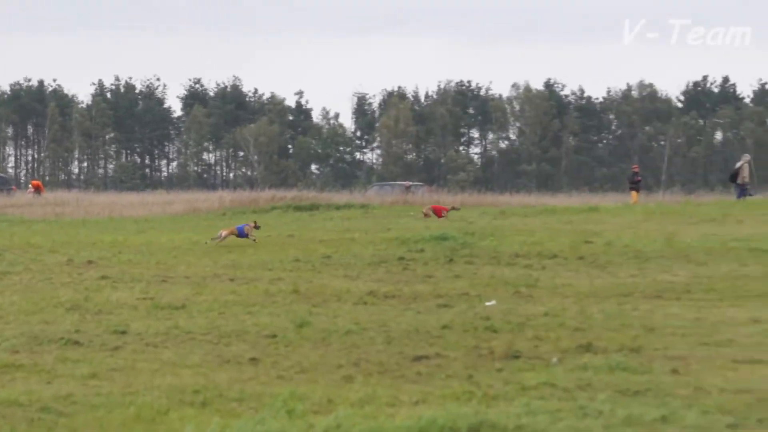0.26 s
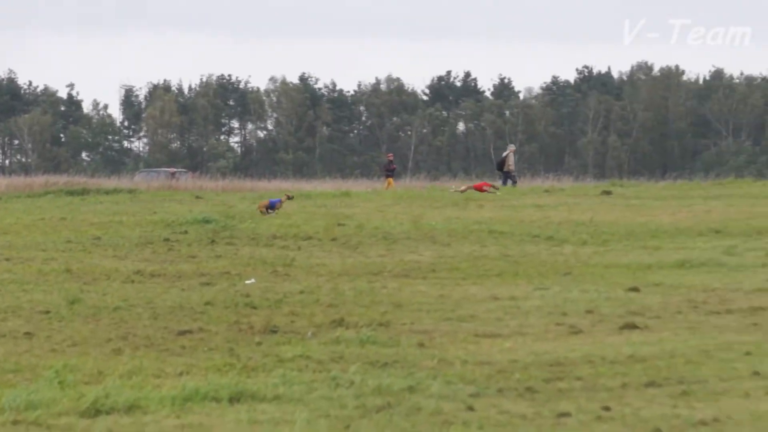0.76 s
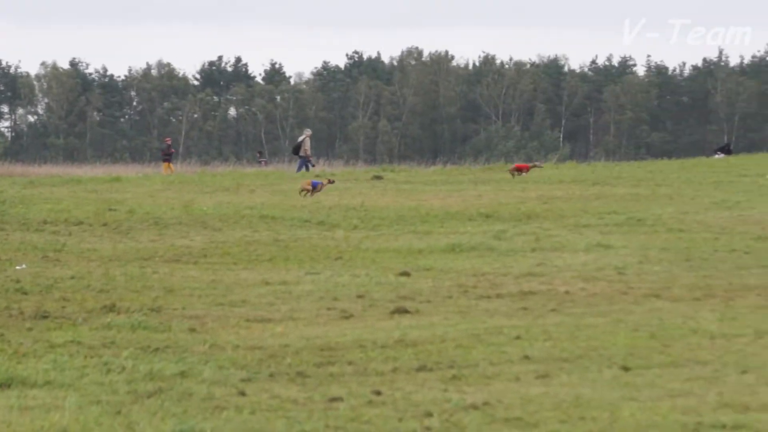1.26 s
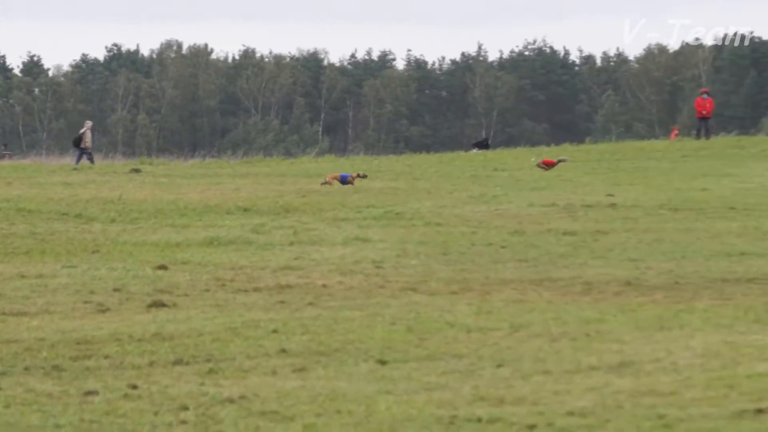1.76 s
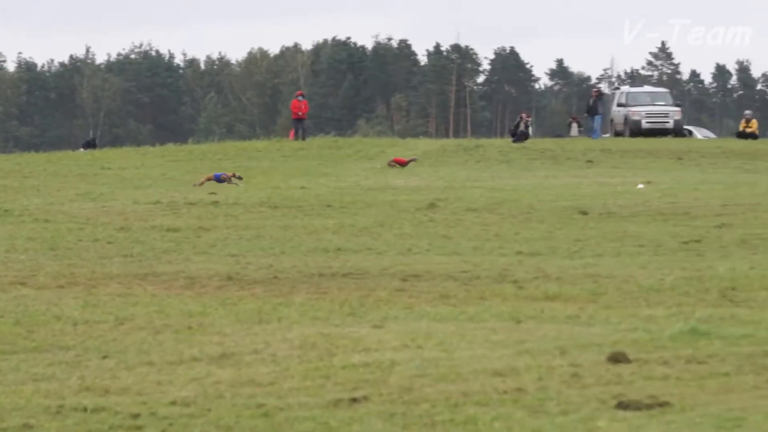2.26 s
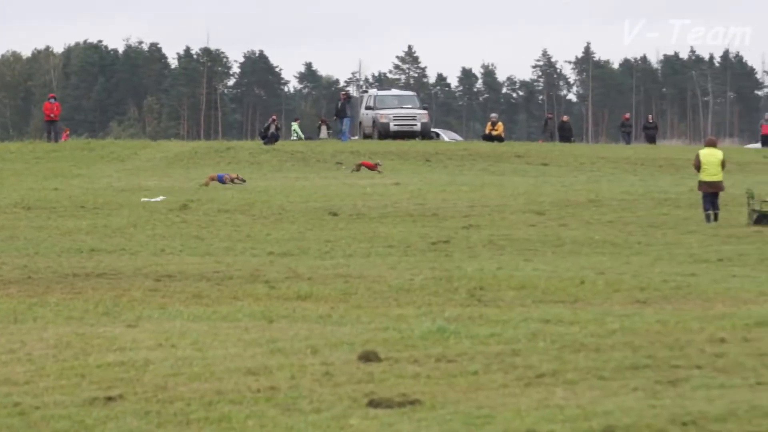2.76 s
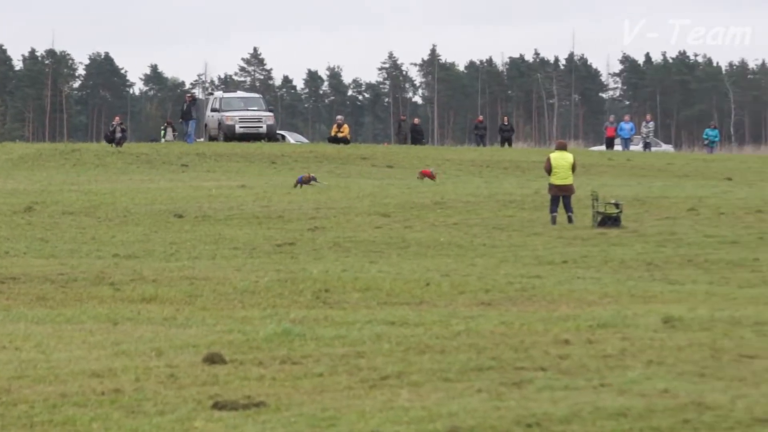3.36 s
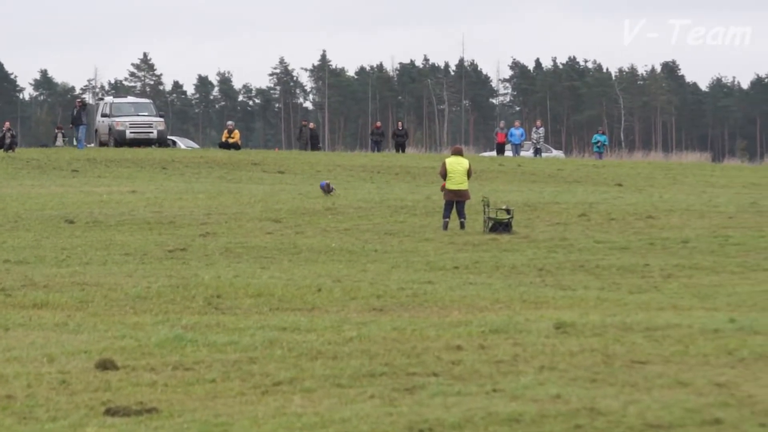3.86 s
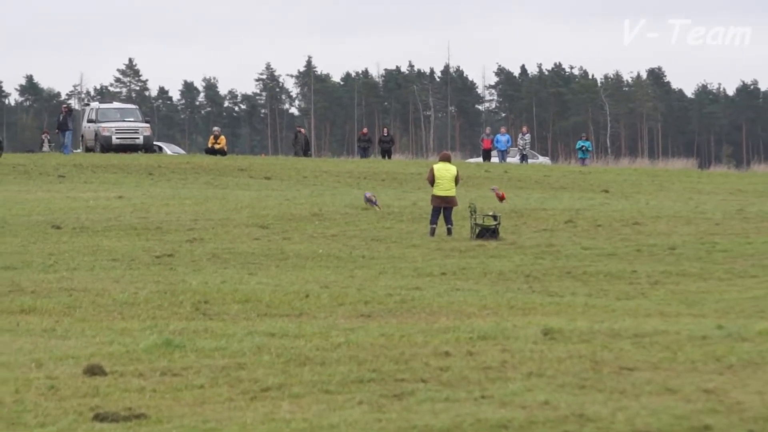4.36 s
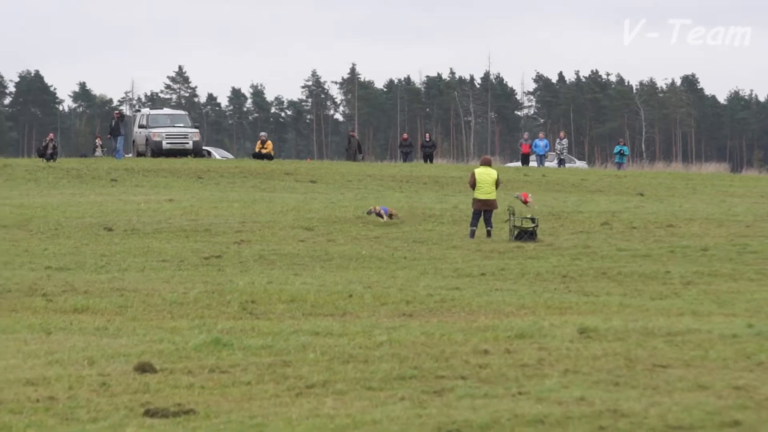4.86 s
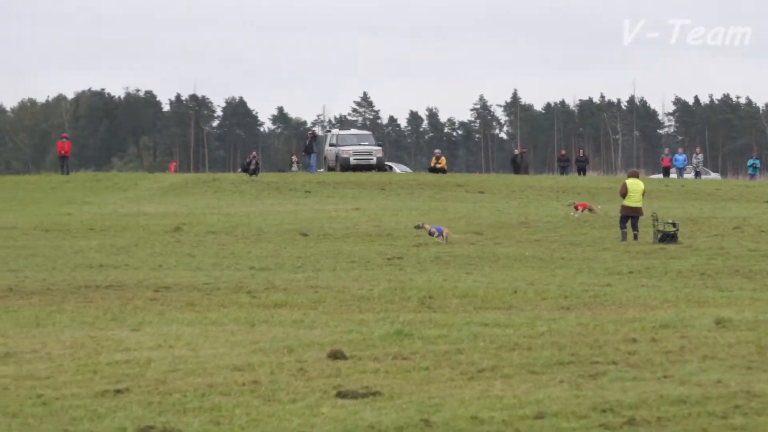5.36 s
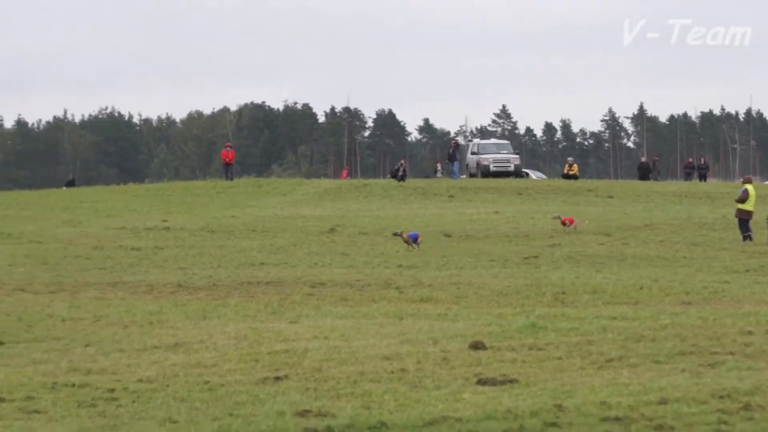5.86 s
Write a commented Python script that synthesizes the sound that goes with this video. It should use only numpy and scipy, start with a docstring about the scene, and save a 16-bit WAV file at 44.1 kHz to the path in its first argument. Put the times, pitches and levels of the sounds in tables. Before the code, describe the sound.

Close, uneven wind buffeting dominates, wide and shifting between left and right. Deep soft thuds and fluttering pushes arrive several times a second, edged with dull slaps and dry crackles. Behind them lie a quiet rush of grass and trees and a steady hiss. A barely noticeable whine wavers in the first half. From about two and a half seconds the wind is rougher and brighter, with a short slackening before the end.

```python
"""Gusty wind buffets the two ports of a small camera microphone in an open field.
From the start a breeze, a far rush of grass and a soft hiss are heard: all are shaped noise.
Gusts and short lulls then come and go; thuds are swells of rumble, slaps and crackles are puffs of noise.
From 0.8 s a thin whine, a sine of gliding pitch, comes and goes; near 1.1 s the camera body ticks twice.
Soft rounding of strong pushes and a reshaped stereo difference finish the sound."""
import sys
import numpy as np
from scipy import signal
from scipy.fft import rfft, irfft, next_fast_len
from scipy.io import wavfile
from scipy.ndimage import uniform_filter1d, map_coordinates

SR = 44100
rng = np.random.default_rng(int(sys.argv[2]) if len(sys.argv) > 2 else 0)


def wav_out(sig):
    """Save sig, one row per channel (or a flat mono array), as 16-bit PCM at SR to the path in sys.argv[1]."""
    wavfile.write(sys.argv[1], SR, np.round(np.clip(np.atleast_2d(sig).T, -1, 1) * 32767).astype(np.int16))


N = 269186  # length in samples


def amp(db):
    """dB to gain."""
    return 10 ** (np.asarray(db) / 20)


def unit(x):
    """Scaled to rms 1."""
    return x / np.sqrt(np.mean(x ** 2) + 1e-20)


def along(points, hz):
    """Read a value at each frequency from (Hz, value) points on a log axis."""
    f, v = np.transpose(points)
    return np.interp(np.log(hz + 1), np.log(f + 1), v)


def curves(rows):
    """One value per sample for each column after the time."""
    s, *cols = np.transpose(rows)
    return [np.interp(np.arange(N) / SR, s, c) for c in cols]


def wobble(rate):
    """A smooth random curve for each port, with rate knots a second."""
    at = [np.arange(N) * rate / SR]
    return np.array([map_coordinates(knots, at) for knots in rng.standard_normal((2, N // 50))])


def filtered(x, response):
    """Multiply the spectrum of x by a response of frequency."""
    edge = 4096
    size = next_fast_len(N + 16384)
    # mirror both ends so that the sound goes on past them
    x = np.pad(x, [(0, 0)] * (x.ndim - 1) + [(edge, edge)], "reflect")
    spectrum = rfft(x, size) * response(np.fft.rfftfreq(size, 1 / SR))
    return irfft(spectrum, size)[..., edge:edge + N]


def causal(spectrum):
    """A response of that colour that starts only when struck (minimum phase)."""
    def response(hz):
        cepstrum = irfft(np.log(amp(along(spectrum, hz)) + 1e-6))
        half = len(cepstrum) // 2
        cepstrum[1:half] *= 2  # fold the part before time zero onto the part after it
        cepstrum[half + 1:] = 0
        return np.exp(rfft(cepstrum))
    return response


def turbulence(spectrum, lumps_db, level_db):
    """Unrelated noise at each port, made lumpy, played at a level and coloured."""
    colour = lambda hz: amp(along(spectrum, hz))
    lumpy = amp(lumps_db) * rng.standard_normal((2, N))
    colour_rms = np.sqrt(np.mean(colour(np.fft.rfftfreq(N, 1 / SR)) ** 2))
    return filtered(amp(level_db) * lumpy, colour) / (np.std(lumpy) * colour_rms)


def puffs(times, levels_db, pans_db, rise):
    """Short noise puffs that swell for rise seconds and die away, louder at one port."""
    out, t = np.zeros((2, N + SR)), np.arange(1200) / SR
    shape = t / rise * np.exp(1 - t / rise)
    noise = rng.standard_normal((len(times), 2, len(t))) * shape
    for s, db, pan_db, puff in zip(times, levels_db, pans_db, noise):
        start = round(s * SR)
        out[:, start:start + len(t)] += amp(db + pan_db * np.array([[.7], [-.7]])) * puff
    return out[:, :N]


SMALL_SPREAD_DB, SMALL_PAN_DB = 3.5, 11.5  # average lift by chance; largest lean setting to a side


def small_eddies(level_db, count):
    """Random times, count a second, with levels riding on a layer's level, and random sides."""
    at, size, side = rng.random((round(count * N / SR), 3)).T
    index = (at * (N - 1)).astype(int)
    levels_db = level_db[index] - SMALL_SPREAD_DB * np.log(size)
    return at * (N - 1) / SR, levels_db, SMALL_PAN_DB * (2 * side - 1)


# Separate gusts at the ports. Each row: start in seconds, time held in seconds, flutter setting in dB,
# fizz over flutter in dB, sizzle over flutter in dB, lean setting in dB (plus is left).
# wind() adds a small fixed trim to each layer and scales the lean.
GUSTS = [(0.174, 0.098, -25.5, -13.5, -44, -1), (0.353, 0.013, -25.5, -20, -45, 1),
         (0.555, 0.018, -25, -21, -54, 0), (0.651, 0.1, -25.5, -9.5, -45, -1),
         (0.777, 0.042, -31, -12, -36, 2.5), (0.855, 0.053, -32, -15, -42, 2),
         (1.152, 0.032, -32.5, -29, -45, 0.5), (1.237, 0.069, -24, -14.5, -45, -2),
         (1.36, 0.045, -28, -17, -42, -2.5), (1.436, 0.052, -28.5, -16, -51, 0),
         (1.455, 0.049, -40, -18, -41, -1.0), (1.563, 0.087, -22, -20.5, -42, 1.5),
         (1.656, 0.05, -20, -26, -55, -0.5), (1.779, 0.063, -24, -13.5, -40, 0.5),
         (1.844, 0.085, -31, -31, -53, -3.5), (1.92, 0.034, -41, -27, -46, -7),
         (1.976, 0.049, -29.5, -34, -49, 1), (2.071, 0.016, -23.5, -31, -48, -1),
         (2.146, 0.024, -27.5, -7, -37, 3), (2.194, 0.051, -32, -24, -41, -2),
         (2.24, 0.022, -32, -20, -41, 1), (2.335, 0.041, -35, -11, -24, 1),
         (2.461, 0.089, -25.5, -10, -35, 0.5), (2.555, 0.026, -24.5, -15, -37, -3),
         (2.632, 0.044, -24.5, -13.5, -32, 1.5), (2.705, 0.079, -24.5, -16, -38, 2),
         (2.842, 0.065, -24, -15, -42, 1.5), (2.946, 0.079, -24, -19, -42, 1.5),
         (3.03, 0.047, -30.5, -33, -46, -3), (3.117, 0.033, -44, -33, -44, -3),
         (3.16, 0.019, -31, -16, -37, -6), (3.22, 0.043, -31.5, -14, -33, -8),
         (3.31, 0.041, -26, -22, -35.5, 2), (3.411, 0.062, -21, -13.5, -36, 0),
         (3.517, 0.051, -23, -10, -32.5, 1), (3.608, 0.048, -23, -15, -32, 0),
         (3.678, 0.082, -23.5, -9.5, -31, -0.5), (3.789, 0.11, -25, -6.5, -33, -1),
         (3.9, 0.044, -35, -15, -35, 7), (3.947, 0.034, -45, -14, -35, -3),
         (3.982, 0.1, -26.5, -7.5, -36, 0), (4.22, 0.076, -26.5, -9, -32, -0.5),
         (4.361, 0.11, -23.5, -8, -28.5, -0.5), (4.48, 0.068, -24, -8.5, -36, 2),
         (4.592, 0.045, -33, -15, -32, 6), (4.732, 0.052, -30, -12, -27.5, 1),
         (4.835, 0.055, -26, -11.5, -34, 0.5), (4.881, 0.028, -25, -6, -27, 1),
         (4.952, 0.088, -23.5, -8, -29, 0), (5.08, 0.14, -23, -9, -32.5, 2.5),
         (5.264, 0.033, -24.5, -24, -33, -0.5), (5.718, 0.059, -33, -18, -35, 1),
         (5.753, 0.027, -39, -19, -27, 0.5), (5.858, 0.093, -26, -8.5, -31, 2),
         (6.044, 0.053, -25, -27, -40, 0.5)]
RISE_DB_PER_S, FALL_DB_PER_S = 411, 343  # how fast a gust arrives and dies
GUST_RUMBLE_DB = -7.5  # over its flutter
# The breeze between gusts. Each row: time in seconds, flutter setting in dB before the trim.
BREEZE = [(0.0, -36), (1.75, -33), (2.43, -34.5), (2.65, -31), (3.18, -31), (3.65, -30), (4.13, -33),
          (5.08, -30.5), (5.37, -32), (6.1, -30)]
BREEZE_FIZZ_DB, BREEZE_SIZZLE_DB, BREEZE_RUMBLE_DB = -15, -37.5, 3.5  # over its flutter
# Deep thuds of big eddies. Each row: middle in seconds, rumble setting in dB before the trim.
THUDS = [(0.035, -21), (.27, -24), (.53, -22.5), (.8, -27.5), (1.27, -25), (1.6, -25), (2.0, -23),
         (2.34, -24.5), (2.362, -23), (2.445, -24), (2.529, -16.5), (2.72, -23), (3.289, -19), (3.46, -26),
         (3.7, -16), (3.859, -18), (4.3, -20.5), (4.45, -19), (4.59, -25), (4.76, -20), (5.0, -22),
         (5.35, -33), (5.47, -28), (5.617, -17), (5.83, -22.5), (6.07, -36)]
THUD_S = 0.013  # half width
# Brief lulls when the air at the ports slackens. Each row: middle in seconds, half width in seconds,
# depth in dB for flutter, scaled for the other layers (below zero lifts the level slightly).
LULLS = [(0.076, 0.024, 8.5), (.44, 0.045, 5), (.5, 0.019, 1.5), (.965, 0.018, 3.5), (1.102, 0.011, 11),
         (1.415, 0.012, 8), (1.655, 0.029, 14.5), (2.04, 0.023, 6), (2.275, 0.023, 11.5),
         (2.315, 0.019, 2.5), (2.4, 0.011, 4.5), (3.014, 0.027, 10), (3.599, 0.035, 5.5), (3.667, 0.019, 8),
         (4.17, 0.031, 1.5), (4.518, 0.017, 10.5), (4.555, 0.019, 7), (5.239, 0.049, 12.5),
         (5.42, 0.02, -0.5), (5.53, 0.075, 7.5), (5.68, 0.032, 1), (5.79, 0.022, 3), (6.01, 0.04, 6)]


def gusts():
    """Wind levels and lean: gusts rise, hold and fall over a breeze, thuds swell, lulls act on all layers."""
    t = np.arange(0, N, 32) / SR
    bell = lambda s, width: np.exp(-((t - s) / width) ** 2)
    s, length, db, fizz_db, sizzle_db, pan_db = np.transpose(GUSTS)[..., None]
    before = np.clip(s - t, 0, None)
    after = np.clip(t - s - length, 0, None)
    power = amp(2 * (db - RISE_DB_PER_S * before - FALL_DB_PER_S * after))  # doubled dB turns gain into power
    calm = amp(2 * np.interp(t, *np.transpose(BREEZE)))
    layer = lambda over_db, calm_db: (power * amp(2 * over_db)).sum(0) + calm * amp(2 * calm_db)
    flutter = layer(0, 0)
    thuds = sum(amp(2 * thud_db) * bell(middle, THUD_S) for middle, thud_db in THUDS)
    levels_db = 10 * np.log10([flutter,
                               layer(fizz_db, BREEZE_FIZZ_DB),
                               layer(sizzle_db, BREEZE_SIZZLE_DB),
                               layer(GUST_RUMBLE_DB, BREEZE_RUMBLE_DB) + thuds])
    hush_db = sum(depth_db * bell(middle, width) for middle, width, depth_db in LULLS)
    hush_db = hush_db * np.array([[1], [1.2], [1.1], [.7]])  # flutter, fizz, sizzle, rumble
    lean_db = (power * pan_db).sum(0) / flutter
    return curves(np.transpose([t, *(levels_db - hush_db), lean_db]))


# Colours of the four wind layers, low to high. Each row: frequency in Hz, relative level in dB.
RUMBLE = [(12, -18), (22, -10), (45, 3.5), (90, 7), (150, 4.5), (250, -4.5), (500, -24.5), (1000, -120)]
FLUTTER = [(30, -99), (60, -9), (120, -5.5), (200, 0), (330, -2), (550, -10), (900, -29), (1600, -47),
           (3000, -120)]
FIZZ = [(200, -36), (400, -7.5), (700, 2.5), (1100, -8.5), (1800, -21.5), (3000, -47), (5000, -77),
        (7000, -120)]
SIZZLE = [(700, -35), (1500, -2.5), (2300, 0), (3500, -9), (5000, -16), (7000, -25), (9500, -78)]


def wind(air):
    """Passing eddies make noise at the ports; shared swells join the layers, finer wobbles roughen them."""
    flutter_db, fizz_db, sizzle_db, rumble_db, pan_db = air
    lean_db = pan_db * [[.6], [-.6]]
    slow, quick = wobble(25), wobble(80)
    rumble = turbulence(RUMBLE, 2.0 * slow + 0.74 * quick, rumble_db + 1.5 + lean_db)
    rumble[0] += 0.15 * np.roll(rumble[1], 60)  # big eddies sweep across both ports, the left one later
    flutter_lumps_db = 1.23 * slow + 2.0 * quick + 2.43 * wobble(250)
    flutter = turbulence(FLUTTER, flutter_lumps_db, flutter_db + 1.5 + lean_db)
    fizz_lumps_db = 2.03 * slow + 2.0 * quick + 4.8 * wobble(400)
    fizz = turbulence(FIZZ, fizz_lumps_db, fizz_db + 0.5 + lean_db)
    sizzle_lumps_db = 1.5 * slow + 2.5 * quick + 2.5 * wobble(500)
    sizzle = turbulence(SIZZLE, sizzle_lumps_db, sizzle_db + 4 + lean_db)
    return rumble + flutter + fizz + sizzle


# Colour of the far rush. Each row: frequency in Hz, relative level in dB.
GRASS = [(200, -18), (500, 1), (1000, 1), (1600, -4.5), (2500, -16), (4000, -22.5), (7000, -32.5)]
# Course of the far rush. Each row: time in seconds, level setting in dB before two noises are summed.
FIELD = [(0.0, -58.5), (1.0, -61), (1.9, -60), (2.35, -54.5), (3.2, -58), (4.5, -53.5), (6.1, -54)]


def grass():
    """The far rush of grass and trees, alike at both ports, rising and sinking slowly."""
    swell_db = 2.2 * wobble(3.7)
    return turbulence(GRASS, swell_db, curves(FIELD)[0]).sum(axis=0)


# Colour of the hiss. Each row: frequency in Hz, relative level in dB.
HISS = [(500, -10), (1500, 0), (4000, -1), (6800, -2), (8300, 0), (10000, -2.5), (11800, -2), (13000, -7),
        (14200, -15)]


def hiss():
    """Steady soft hiss, given a random patchy level that varies more towards the treble."""
    z = signal.stft(turbulence(HISS, 0, -64.0), nperseg=512)[2]
    patches = uniform_filter1d(rng.standard_normal(z.shape[1:]), size=40, axis=0)
    patches = unit(uniform_filter1d(patches, size=6, axis=1))
    depth_db = np.linspace(0, 4, len(patches))[:, None]
    return signal.istft(z * amp(depth_db * patches), nperseg=512)[1][:, :N]


# The sharpest small eddies bursting on a port. Each row: start in seconds, level setting in dB,
# bright part over that in dB, lean setting in dB (plus is left). slaps() adds fixed trims.
SLAPS = [(0.019, -23, -27, -1.5), (0.198, -21, -27, 6), (0.659, -23, -31, -6), (0.704, -18, -26, -6),
         (0.787, -19.5, -25, 6), (0.995, -31.5, -42, -19), (1.173, -32, -29, -6), (1.236, -24, -31, 2),
         (1.276, -19.5, -24, 5.5), (1.348, -24.5, -27, 11.5), (1.427, -30, -34, -1), (1.573, -27, -18, 0),
         (1.777, -12.5, -42, 4.5), (1.834, -23, -19, -2), (2.433, -18, -26, -1), (2.487, -25, -35, -12),
         (2.537, -12.5, -29, 2), (2.58, -15.5, -27, 6), (2.619, -26, -27, 8), (2.658, -15, -24, -1.5),
         (2.704, -26, -20, 5), (2.816, -20.5, -26, -5), (2.901, -20, -24, -2), (3.076, -29, -18, 2),
         (3.407, -32, -17, 1), (3.461, -16, -25, 9.5), (3.562, -17, -36, -1), (3.626, -29.5, -6.5, 6),
         (3.694, -17, -18.5, 4), (3.739, -24, -33, -10), (3.788, -24, -30, -1), (3.816, -19.5, -30, -1),
         (3.842, -13, -33, -4), (4.044, -24, -28, -6), (4.222, -24, -32, 2), (4.283, -13, -45, 2.5),
         (4.351, -27, -19, 6), (4.418, -14, -21, 2.5), (4.452, -17.5, -16, 4), (4.598, -15, -25, 2),
         (4.618, -25, -24, 6), (4.74, -16, -24, -1), (4.844, -18, -29, 2.5), (4.876, -21, -22, -7),
         (4.963, -17.5, -19, 4), (5.034, -14, -34, 3), (5.106, -11, -29, -2), (5.826, -17, -27, 0),
         (5.883, -24, -17, -3), (6.064, -14.5, -21.5, 3)]
# Colour of a slap's bright part and a crackle's lower part. Each row: frequency in Hz, level in dB.
CRACKLE = [(500, -24.5), (1200, 10.5), (2200, 2), (4000, -13.5), (6000, -30.5), (8000, -39), (9500, -108)]
SMALL_PER_S, SMALL_SLAP_DB = 24, -6.5  # random slaps a second; their setting over flutter, before trim


def slaps(air):
    """Small eddies burst as puffs of a few milliseconds, dull and bright; more dull ones come at random."""
    s, db, bright_db, pan_db = np.transpose(SLAPS)
    at, small_db, side_db = small_eddies(air[0] + SMALL_SLAP_DB, count=SMALL_PER_S)
    dull = puffs(s, db + 16.5, pan_db, rise=0.0012) + puffs(at, small_db + 4.0, side_db, rise=0.003)
    dull = filtered(dull, causal([(hz * 1.49, v) for hz, v in FLUTTER]))  # flutter's colour, moved up
    bright = puffs(s, db + bright_db + 1.5, pan_db, rise=0.0041)
    return dull + filtered(bright, causal(CRACKLE))


# The loudest thin crackles at the crests of gusts. Each row: start in seconds, lower part's setting in dB,
# higher part's setting in dB, lean setting in dB (plus is left). crackles() adds fixed trims.
CRACKLES = [(0.2055, -40, -57, -0.5), (0.214, -34, -60, -5), (0.7423, -35, -64, -4), (0.7837, -32, -63, -2),
            (1.2356, -42, -54, 2), (1.2518, -29, -58, 1), (1.2786, -45, -48, 3), (1.2934, -41, -63, -1.0),
            (1.314, -35.5, -63, 3), (1.3479, -38, -53, 6), (1.3583, -42, -64, -1.0),
            (1.3944, -54, -74, 0.0), (1.432, -48, -67, -6), (1.4631, -46, -63, 0.5), (1.493, -39, -70, 8),
            (1.5459, -51, -63, 0.5), (1.5633, -41, -55, 4), (1.581, -33, -55, 2), (1.6087, -40, -66, 3.0),
            (1.761, -36, -57, -0.5), (1.7904, -30, -47, 1.0), (1.8074, -40, -59, 2), (1.8435, -33, -62, -3),
            (2.0872, -35, -71, 6), (2.5043, -41, -47, -0.5), (2.54, -39, -44, -3), (2.577, -34, -48, -1),
            (2.6305, -39, -57, 3), (2.642, -37, -51, 5), (2.7118, -31, -58, 4), (2.734, -42, -62, 2.0),
            (2.7654, -33, -62, 6), (2.7905, -27.5, -57, 6), (2.8176, -35, -67, 6), (2.862, -31, -51, 4),
            (2.8784, -46, -46, 1.0), (2.905, -41, -60, -4), (2.9817, -35, -58, 1), (3.076, -43, -63, 5),
            (3.17, -37, -63, 7), (3.2251, -45, -63, 1.5), (3.252, -45, -58, 1.0), (3.3179, -39, -57, 5),
            (3.414, -38, -42, 4), (3.421, -33, -41.5, 6), (3.4506, -37, -39, 3), (3.462, -38, -48, -4),
            (3.5239, -37, -53, -0.5), (3.5394, -37, -55, 5), (3.6117, -34, -58, 0),
            (3.6821, -41, -52, -1.0), (3.705, -35, -50, 3), (3.7264, -41, -48, 2), (3.7474, -39, -55, -1.0),
            (3.7878, -38, -57, -1.5), (3.8214, -40, -52, -0.5), (3.8507, -37, -53, 7),
            (3.8676, -31, -45, 2.0), (3.8814, -37, -54, 7), (3.9161, -40, -47, 7), (4.0478, -36, -56, -3),
            (4.3687, -32, -52, 2.5), (4.396, -24, -42, 9), (4.4399, -22, -47, 1.5), (4.6636, -33, -59, 2),
            (4.6916, -29.5, -54, 1.0), (4.764, -33, -52, 3), (4.881, -24, -46, 4), (4.897, -34, -44, 0.0),
            (4.9076, -39, -57, 3), (4.9567, -36, -35.5, 6), (4.964, -39, -42, 1), (4.9844, -47, -48, 1.0),
            (5.0031, -40, -40.5, 6), (5.023, -29.5, -42, 9), (5.037, -38, -56, 2.0),
            (5.0844, -44, -54, 1.0), (5.1054, -37, -45, 1.5), (5.1244, -38, -51, 3), (5.1642, -36, -43, 3),
            (5.83, -31, -54, 7), (5.8651, -43, -50, 7), (5.9042, -28, -42, 3)]
# Colour of the higher part of a crackle. Each row: frequency in Hz, level in dB.
SPIT = [(1200, -40), (2200, -4.5), (3200, -0.5), (4500, -11), (6500, -26), (9500, -73)]
SMALL_CRACKLES_PER_S, SMALL_CRACKLE_DB = 80, -1  # random crackles a second; their setting over sizzle


def crackles(air):
    """The smallest eddies break on a port's edge as brief low and high puffs; more low ones are random."""
    s, db, high_db, pan_db = np.transpose(CRACKLES)
    small = puffs(*small_eddies(air[2] + SMALL_CRACKLE_DB, count=SMALL_CRACKLES_PER_S), rise=0.0012)
    low = filtered(puffs(s, db - 6, pan_db, rise=0.0018) + small, causal(CRACKLE))
    high = filtered(puffs(s, high_db + 6.5, pan_db, rise=0.002), causal(SPIT))
    return low + high


# The far whine, one list a glide. Each row: time in seconds, middle pitch in Hz, middle rms level in dB.
WHINE = [
    [(.78, 1545, -61), (.89, 1535, -63), (.93, 1480, -67), (.96, 1555, -60), (1.04, 1640, -60),
     (1.1, 1665, -62), (1.14, 1810, -60), (1.175, 1640, -63)],
    [(1.54, 1760, -67), (1.58, 1745, -63), (1.69, 1810, -63), (1.74, 1760, -65)],
    [(1.82, 2060, -66), (1.91, 2110, -66)],
    [(2.02, 1480, -63), (2.1, 1580, -61), (2.2, 1620, -62), (2.26, 1675, -63), (2.305, 1590, -60),
     (2.345, 1475, -66), (2.38, 1465, -70), (2.43, 1465, -65)],
    [(3.2, 1800, -65), (3.3, 1830, -65)],
]


def whine():
    """A single thin tone, faded at both ends, its pitch trembling in the moving air."""
    out, t = np.zeros(N), np.arange(N) / SR
    tremble, flicker = wobble(40)
    for glide in WHINE:
        hz, db = curves(glide)
        fade = np.clip(np.minimum(t - glide[0][0], glide[-1][0] - t) / 0.012, 0, 1)
        loudness = fade * np.sqrt(2) * amp(db + 1.8 * flicker)
        out += loudness * np.sin(2 * np.pi * np.cumsum(hz + 12 * tremble) / SR)
    return out


# Ticks of the camera body. Each row: start in seconds, pitch in Hz, level setting in dB before
# the soft onset and the lean, time to die by 60 dB in seconds.
TICKS = [(1.071, 2170, -36, 0.012), (1.1048, 8160, -25, 0.0023)]


def ticks():
    """Small plastic ticks in the camera body: sines with a soft onset that die away fast."""
    out, t = np.zeros(N), np.arange(1500) / SR
    for s, hz, db, t60 in TICKS:
        onset = 1 - np.exp(-t / 0.00065)
        tick = amp(db - 60 * t / t60) * np.sin(2 * np.pi * hz * t) * onset
        out[round(s * SR):][:len(t)] += tick
    return out


def scene():
    """What reaches the two ports."""
    air = gusts()
    leaning_ticks = ticks() * amp([[1.5], [-1.5]])
    return wind(air) + grass() + slaps(air) + crackles(air) + whine() + leaning_ticks


# How the camera reshapes the stereo. Each row: frequency in Hz, gain of the left-right difference in dB.
WIDEN = [(60, -10), (130, -2.5), (280, 3), (610, 7), (1330, 7), (2890, 4), (5000, 3), (8000, 3),
         (13600, 5.5)]
TOP_HZ = 14250  # nothing passes from here up


def record(dry):
    """Capsules round off strong pushes, hiss joins, a widener reshapes left-right, the treble is cut."""
    rounded = dry / (1 + np.abs(dry / 0.48) ** 3) ** (1 / 3)
    x = rounded + hiss()
    mid = (x[0] + x[1]) / np.sqrt(2)
    side = filtered((x[0] - x[1]) / np.sqrt(2), lambda hz: amp(along(WIDEN, hz)))
    stereo = np.array([mid + side, mid - side]) / np.sqrt(2)
    return filtered(stereo, lambda hz: hz < TOP_HZ)


dry = scene()
out = record(dry)
wav_out(out)
```